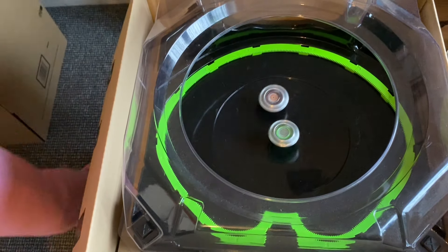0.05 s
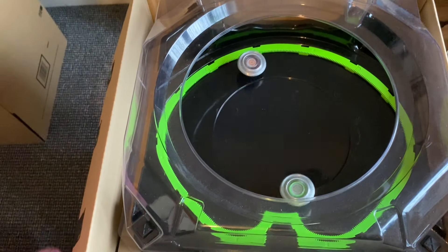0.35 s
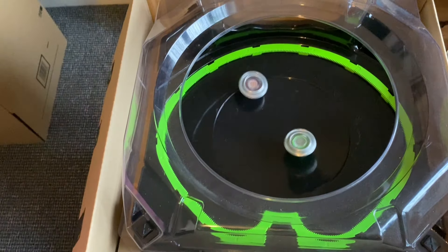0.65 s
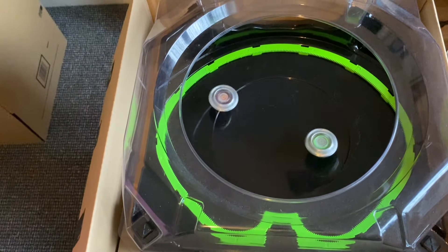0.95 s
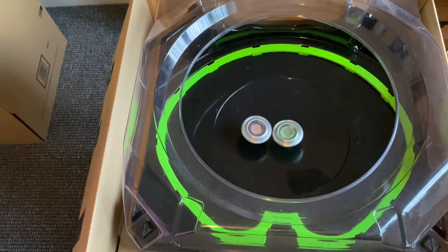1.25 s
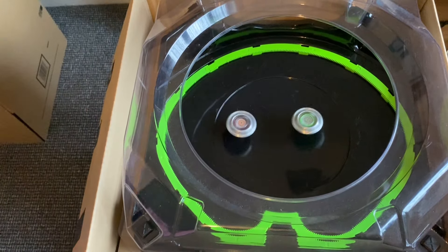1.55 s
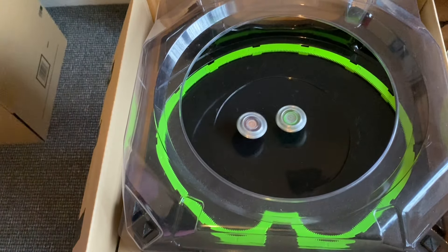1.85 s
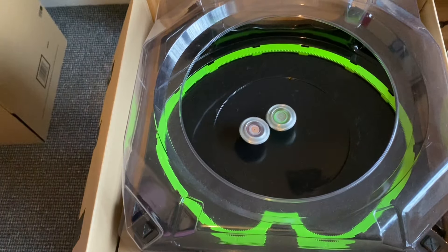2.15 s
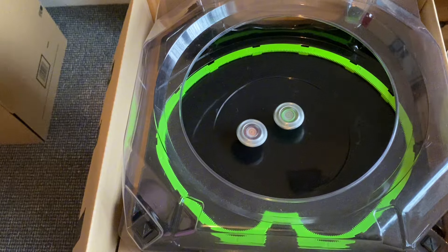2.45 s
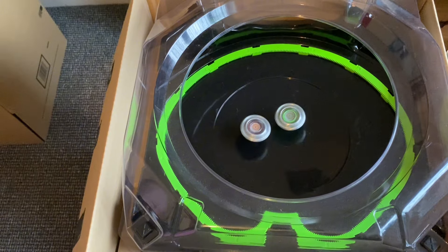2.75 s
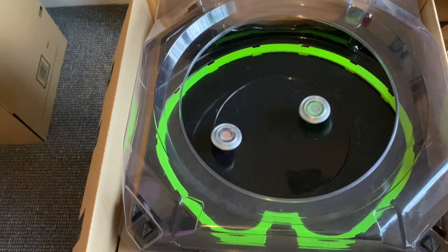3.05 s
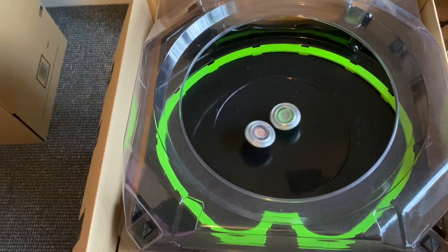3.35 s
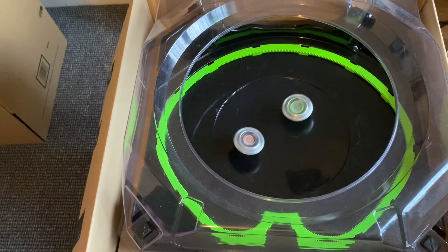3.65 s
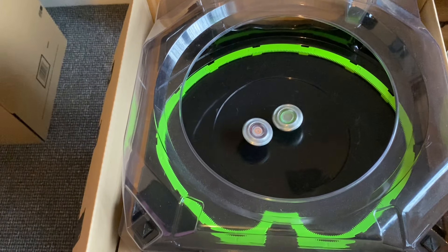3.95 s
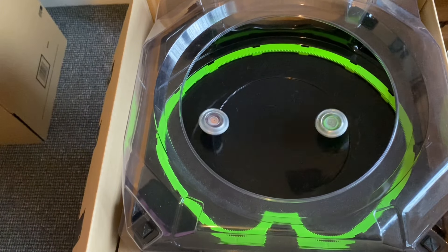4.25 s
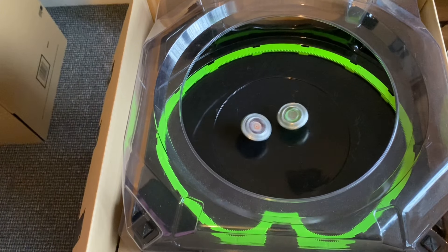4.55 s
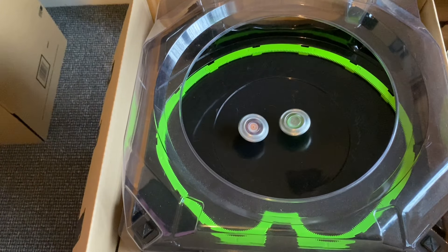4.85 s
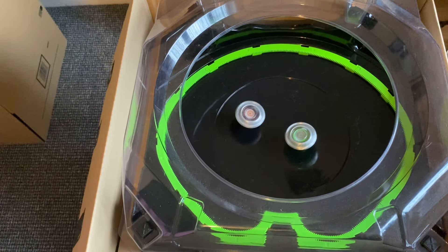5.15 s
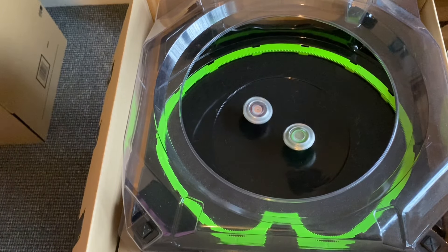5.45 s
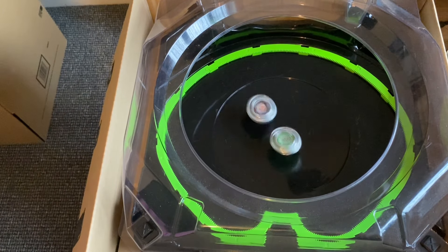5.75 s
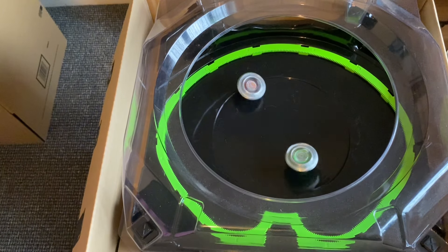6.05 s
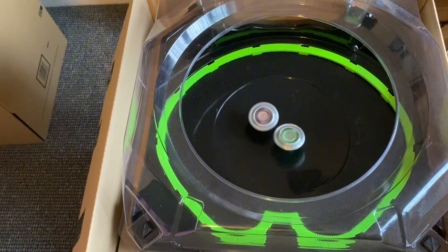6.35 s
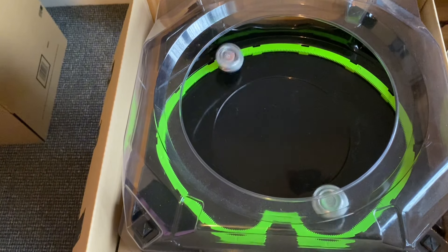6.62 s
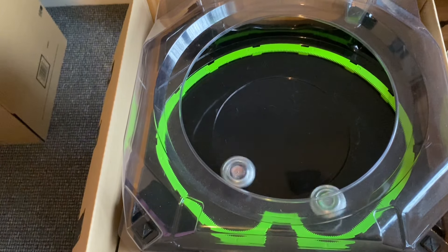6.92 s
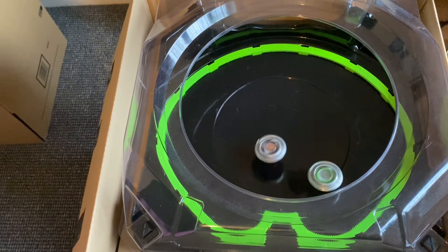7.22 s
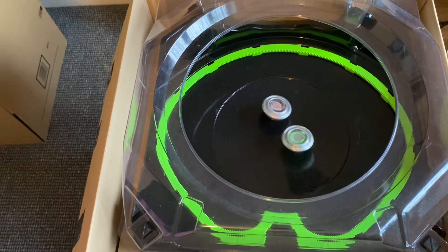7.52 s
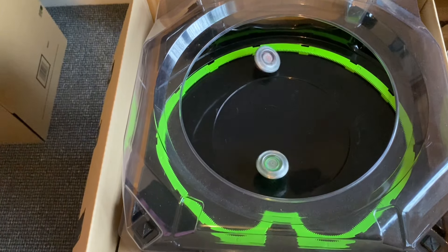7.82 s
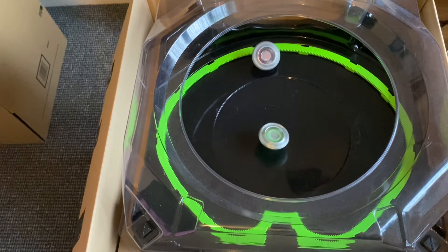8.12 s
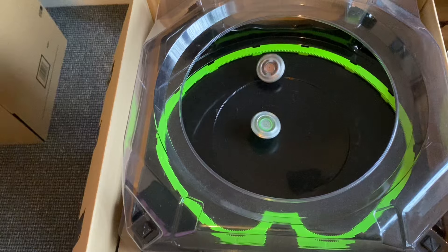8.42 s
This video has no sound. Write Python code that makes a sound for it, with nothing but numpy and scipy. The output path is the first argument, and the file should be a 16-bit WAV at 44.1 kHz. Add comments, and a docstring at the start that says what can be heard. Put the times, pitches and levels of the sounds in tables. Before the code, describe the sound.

Irregular metallic clacks and hollow plastic rattles as two whirring toy tops clash and skid around a plastic arena.

```python
"""Two metal spinning tops battle in a thin plastic bowl, close by in a small room.
From the start the rims whirr and the tips scrape and drum, pulsing once a turn. From 0.1 s the
toothed rims clash in bright clacks that jolt the bowl; the tops skid and tap the wall. Between
1 and 6 s they stand upright in near-silent spells, clashing and, from 3.4 s, grazing. From 6.6 s
the slowing tops wobble and scrape roughly; the last clash comes at 7.6 s."""
import sys
import numpy as np
from scipy import signal
from scipy.fft import rfft, irfft, next_fast_len
from scipy.io import wavfile
from scipy.ndimage import map_coordinates

SR = 44100
rng = np.random.default_rng(int(sys.argv[2]) if len(sys.argv) > 2 else 0)


def dump_mix(stems):
    """Bounce the given channels to the path in sys.argv[1] as a 16-bit WAV at rate SR."""
    frames = np.atleast_2d(stems).T  # one column per channel
    limited = np.clip(frames, -1, 1)  # hard clip at full scale
    pcm = np.round(limited * 32767).astype(np.int16)
    wavfile.write(sys.argv[1], SR, pcm)


N = 378378
HIT_SIZE = 2 ** 14  # samples
GRIT_DB, GRIT_HZ = 4, 220  # grain of a sliding contact
BOWL_LAG_S = 0.012

# bowl modes: f/Hz, width/Hz, level/dB
BOWL_MODES = [(66.6, 18, 10), (110, 12, 2), (136, 22, 11.5), (174, 18, 12.5), (215.7, 16.5, 6),
              (306, 20, 12), (356, 22, 14), (521, 38, 12.5), (700, 40, 3), (799, 36, 5), (1092, 40, 6),
              (1291, 45, 7), (1389, 35, 3.5), (1900, 150, 2), (2740, 40, 1), (3120, 80, 0)]
# spectra of tip drumming, metal sizzle, bowl thump, plastic rattle: f/Hz, level/dB
DRUM_SPECTRUM = [(20, -29), (38, -16), (58, -5.5), (125, 2), (200, -5), (280, -15.5), (450, -21),
                 (800, -39.5), (2500, -49)]
SIZZLE_SPECTRUM = [(500, -18.5), (2500, -11), (3900, -1.5), (4700, -5), (6100, -7), (7700, -2.5),
                   (9500, -11), (12000, -15.5), (16000, -23)]
THUMP_SPECTRUM = [(25, -42.5), (60, -12.5), (130, 6), (300, 1), (500, -9.5), (900, -17), (2000, -19.5),
                  (6000, -60)]
RATTLE_SPECTRUM = [(100, -28), (240, -12), (350, 2), (600, 4), (1100, 0), (1500, -4), (2200, 3.5),
                   (3200, -1), (5500, -5), (8000, -3), (11000, -11), (16000, -19.5)]


def amp(db):
    """Decibels to gain."""
    return 10 ** (np.asarray(db) / 20)


def unit(x):
    """Scale to rms 1."""
    return x / np.sqrt(np.mean(x ** 2) + 1e-20)


def along(points, hz):
    """Interpolate (f/Hz, value) points on a log axis."""
    f, v = np.transpose(points)
    return np.interp(np.log(hz + 1), np.log(f + 1), v)


def curves(rows):
    """Per-sample curve of each column after t/s."""
    s, *cols = np.transpose(rows)
    return [np.interp(np.arange(N) / SR, s, c) for c in cols]


def wobble(rate_hz):
    """Smooth random curve with knots at rate_hz."""
    knots = rng.standard_normal(int(N * rate_hz / SR) + 4)
    return map_coordinates(knots, [np.arange(N) * rate_hz / SR])


def filtered(x, response):
    """Apply a frequency response."""
    size = next_fast_len(N + SR // 2)
    return irfft(rfft(x, size) * response(np.fft.rfftfreq(size, 1 / SR)), size)[..., :N]


def shaped(x, spectrum):
    """Filter by (f/Hz, level/dB) points."""
    return filtered(x, lambda hz: amp(along(spectrum, hz)))


def resonance(hz, centre_hz, width_hz):
    """Gain of one mode."""
    return 1 / np.sqrt(1 + (2 * (hz - centre_hz) / width_hz) ** 2)


def body(spectrum, modes, hz):
    """Gain of a broad spectrum with modes on top."""
    peaks = sum((amp(db) * resonance(hz, f, width)) ** 2 for f, width, db in modes)
    return amp(along(spectrum, hz)) * np.sqrt(1 + peaks)


def hit_axes():
    """t/s and f/Hz of one hit."""
    return np.arange(HIT_SIZE) / SR, np.fft.rfftfreq(HIT_SIZE, 1 / SR)


def struck(force, gain):
    """Minimum-phase response of a body to a short force."""
    cepstrum = irfft(np.log(np.maximum(gain, 1e-6)))
    cepstrum[1:HIT_SIZE // 2] *= 2
    cepstrum[HIT_SIZE // 2 + 1:] = 0
    return irfft(rfft(force) * np.exp(rfft(cepstrum)))


def levelled(x, lo_hz, hi_hz, span_s):
    """Scale a hit's band energy to that of rms 1 over span_s."""
    hz = np.fft.rfftfreq(HIT_SIZE, 1 / SR)
    band = irfft(rfft(x) * ((hz > lo_hz) & (hz < hi_hz)))
    return x * np.sqrt(span_s * SR / (np.sum(band ** 2) + 1e-20))


def add(track, s, sound):
    """Mix a sound in at time s."""
    start = max(round(s * SR), 0)
    part = track[start:start + len(sound)]
    part += sound[:len(part)]


def spinning(spin_hz, second_touch):
    """One top: imbalance hum, and tip pressure peaking once or twice a turn."""
    angle = 2 * np.pi * np.cumsum(spin_hz * (1 + 0.0038 * wobble(8))) / SR
    hum = sum(amp(along(DRUM_SPECTRUM, k * spin_hz) + 4 * wobble(7))
              * np.sin(k * angle + rng.uniform(0, 2 * np.pi)) for k in range(1, 7))
    touch = lambda phase: np.exp(4 * (np.cos(phase) - 1))
    return hum, touch(angle) + second_touch * touch(angle + np.pi)


def wall(hz):
    """Gain of the hollow-ringing wall."""
    # wall modes: f/Hz, width/Hz, level/dB
    modes = [(523, 38, -2.5), (563, 33, -7.5), (690, 17, -9), (1095, 43, -10), (1295, 18, -13),
             (1410, 21, -16), (1567, 30, -17.5), (1955, 140, -14.5)]
    return np.sqrt(sum((amp(db) * resonance(hz, f, width)) ** 2 for f, width, db in modes))


def tips():
    """Tips hum, drum and scrape on the bowl, pulsing each turn; rims whirr after the launch."""
    # tip levels, brisk, gentle, then rough: t/s, scrape/dB, drum/dB, sizzle/dB re scrape
    run = [(0, -53.5, -41, -0.5), (.8, -53.5, -41, -4.5), (1.7, -52, -39, -4), (3.1, -57, -44, -9),
           (4.4, -55, -45, -9.5), (4.8, -58.5, -44, -9.5), (6, -55, -44, -3), (6.6, -45, -41.5, -2),
           (7.05, -46.5, -49, -7.5), (7.35, -50, -46, 0), (7.65, -46, -37.5, -1), (7.87, -45.5, -41, -6),
           (8.1, -44, -39.5, 0), (8.58, -44, -42, -4.5)]
    # spin of the wobblier top: t/s, f/Hz
    spin = [(0, 100), (.6, 97), (1.15, 91), (3.2, 65.5), (4.5, 57), (6.2, 52), (7.45, 46.3), (8.58, 43)]
    # spectra of tip scrape and rim whirr: f/Hz, level/dB
    scrape_spectrum = [(100, -27), (300, 10.5), (550, 1.5), (900, 5), (1400, -0.5), (2200, 7), (3200, 0),
                       (4000, -8.5), (5000, -10), (8000, -7), (16000, -25)]
    whirr_spectrum = [(2500, -30), (3600, -10.5), (4150, 3.5), (4600, -1.5), (5400, -9.5), (7000, -31.5)]
    lean_s, launch_s = 8.0, 1.75
    t = np.arange(N) / SR
    scrape_db, drum_db, sizzle_db = curves(run)
    calm_db = calm(t)
    wobbly_hum, wobbly_press = spinning(curves(spin)[0], second_touch=.8 * (t > lean_s))
    other_hum, other_press = spinning(104 * np.exp(-.055 * t), second_touch=0)
    bite = lambda: amp(3.5 * np.tanh(wobble(45)))  # no two turns bite alike
    press = wobbly_press * bite() + .3 * other_press * bite()
    friction = lambda depth: rng.standard_normal(N) * amp(2 * wobble(500)) * (1 + depth * press)
    rumble = unit(filtered(rng.standard_normal(N), lambda hz: body(DRUM_SPECTRUM, BOWL_MODES, hz)))
    drum = unit(1.1 * unit(wobbly_hum + other_hum) + rumble)
    # the tops wander between spots that favour different modes
    spots = [[(f, width, db + rng.normal(1, 3)) for f, width, db in BOWL_MODES] for _ in range(3)]
    scrape = np.zeros(N)
    for modes in spots:
        weight = amp(5 * np.tanh(wobble(5)))
        scrape += weight * filtered(friction(1.15), lambda hz: body(scrape_spectrum, modes, hz))
    # hard-running tops climb the wall
    hollow = unit(filtered(friction(1.15) * amp(GRIT_DB * wobble(GRIT_HZ / 2)), wall))
    hollow *= amp(-10.5 + 0.52 * (scrape_db - scrape_db.mean()) + 2 * wobble(9))
    sizzle = unit(shaped(friction(1.5), SIZZLE_SPECTRUM))
    whirr = unit(shaped(friction(3), whirr_spectrum)) / (1 + (t / launch_s) ** 12)
    grip_db = scrape_db - calm_db + 1.2 * wobble(20)
    return (amp(drum_db - 0.84 * calm_db + 1.9) * drum
            + amp(grip_db + 0.5) * (unit(scrape) + hollow)
            + amp(grip_db + sizzle_db) * sizzle
            + amp(-59 - calm_db) * whirr)


def clacks():
    """Toothed rims chatter for milliseconds, ring and jolt the bowl."""
    # rim clashes: t/s, level/dB, 3 clanks/dB re level, 15 kHz glint/dB, thump/dB, rattle/dB, chatter/s
    clashes = [(0.1187, -17.5, -15, -12.5, -14, -9, -26, -58, 0.0037),
               (0.8152, -18, -17.5, -16, -14, -2, -29, -56, 0.0065),
               (1.2697, -15.5, -11.5, -13, -15.5, -6.5, -29.5, -50.5, 0.0048),
               (1.4461, -16, -28.5, -8, -16.5, 0, -31.5, -46.5, 0.0047),
               (1.8225, -14, -18.5, -17, -22, -7.5, -37, -72, 0.0045),
               (2.1325, -20, -18, -19.5, -10.5, -7, -46.5, -65.5, 0.0029),
               (2.2335, -19, -16, -17, -12.5, -0.5, -44, -70, 0.004),
               (2.372, -15.5, -23, -21, -18, -4.5, -47.5, -78, 0.0054),
               (2.642, -16.5, -23, -10.5, -18.5, -12.5, -39, -56.5, 0.0045),
               (2.888, -15.5, -23.5, -13.5, -17.5, -6, -30, -48.5, 0.0047),
               (3.386, -17.5, -11, -12, -15, 0, -29.5, -51, .004),
               (3.8283, -16.5, -19.5, -13.5, -13.5, -3.5, -30.5, -51, .0025),
               (4.0712, -17, -15, -19.5, -7.5, -1, -32.5, -55, 0.0081),
               (4.6105, -16, -14, -23, -13.5, -12, -32, -56.5, .004),
               (4.96, -16, -12.5, -33.5, -11, -6.5, -37, -65, 0.0049),
               (5.3726, -15.5, -15, -15.5, -21.5, -4, -31.5, -49.5, 0.0023),
               (5.7635, -15, -15, -12.5, -18, -6, -29, -47.5, 0.0037),
               (6.3162, -21.5, -4.5, -13.5, -12, -1, -38, -52, 0.0025),
               (6.4637, -17, -7.5, -14.5, -13, -5, -25, -48, 0.0047),
               (7.1201, -22.5, -11, -18, -8, -5, -30, -41, 0.00082),
               (7.6063, -17.5, -21, -11.5, -8, -11, -29, -52, 0.0056)]
    # high rim modes: f/Hz, width/Hz, level/dB
    rim_modes = [(8000, 400, 2), (9610, 260, 6.5), (10170, 160, 2), (10480, 340, 9), (15240, 220, 11),
                 (15630, 200, 5)]
    # clanking rim modes: f/Hz, width/Hz
    clank_modes = [(3900, 190), (4450, 380), (5450, 560)]
    # impact spectrum: f/Hz, level/dB
    crack_spectrum = [(100, -42.5), (700, -27.5), (1500, -21.5), (2500, -5.5), (4700, -8.5), (6000, 0),
                      (8000, 5.5), (9500, 4), (11500, -1.5), (14000, 4), (15700, -4.5), (17000, -16.5)]
    settle_s, jolt_t60_s = 0.011, 0.073
    metal, bowl = np.zeros(N), np.zeros(N)
    t, hz = hit_axes()
    mean_clank_db = np.mean(clashes, axis=0)[2:5].mean()
    for s, db, *clank_db, glint_db, thump_db, rattle_db, chatter_s in clashes:
        # tooth contacts break off, loose parts settle
        chatter = 1 / (1 + (t / chatter_s) ** 10) + 0.85 * np.exp(-t / settle_s)
        force = chatter * rng.standard_normal(HIT_SIZE)
        # the contact point weights the modes
        modes = [(f, width, level + rng.normal(0, 2.5)) for f, width, level in rim_modes]
        fuller_db = 1.1 * (np.mean(clank_db) - mean_clank_db)
        colour = amp(along([(3000, fuller_db + 0.5), (6200, fuller_db + 2), (7500, 2), (10000, 2.5),
                            (11500, 0.95), (15000, glint_db + 7.5)], hz))
        ring = struck(force, body(crack_spectrum, modes, hz) * colour)
        add(metal, s, amp(db) * levelled(ring, 7500, 12000, .01))
        for (f, width), mode_db in zip(clank_modes, clank_db):
            clank = struck(chatter * rng.standard_normal(HIT_SIZE), resonance(hz, f, width))
            add(metal, s, amp(db + mode_db) * levelled(clank, f - 200, f + 200, .01))
        add(bowl, s, amp(rattle_db + 3.5) * landing_rattle(t, hz))
        jolt = amp(-60 * t / jolt_t60_s)
        add(bowl, s, amp(thump_db) * (amp(-6) * bending_wave(hz) + amp(0.5) * thump(jolt, hz)))
    return amp(-1) * metal + amp(-4.5) * bowl


def bending_wave(hz):
    """A push crosses the thin bowl, highs first, so pitch falls; path and colour vary by spot."""
    ref_hz = 198.3
    delay_s = .008 * np.exp(rng.normal(0, .25))  # at ref_hz
    spot_db = along([(f, rng.normal(0, 3)) for f in (150, 300, 600)], hz)
    tilt_db = along([(70, -5.5), (350, 1), (600, 2.5)], hz)
    gain = amp(along(THUMP_SPECTRUM, hz) + tilt_db + spot_db)
    phase = 4 * np.pi * delay_s * np.sqrt(ref_hz * hz)
    return levelled(irfft(gain * np.exp(-1j * phase)), 150, 900, .03)


def thump(jolt, hz, colour=1):
    """A jolted top bounces on its tip and shakes the bowl."""
    force = rng.standard_normal(HIT_SIZE) * jolt
    return levelled(struck(force, body(THUMP_SPECTRUM, BOWL_MODES, hz) * colour), 150, 900, .03)


def landing_rattle(t, hz):
    """A jolted top lands on the plastic in quick, uneven bounces."""
    land_s, t60_s = 0.032, 0.09
    bounces = amp(5 * map_coordinates(rng.standard_normal(200), [t * 250]))
    envelope = np.minimum(t / land_s, 1) * amp(-60 * np.maximum(t - land_s, 0) / t60_s)
    force = rng.standard_normal(HIT_SIZE) * bounces * envelope
    gain = body(RATTLE_SPECTRUM, BOWL_MODES, hz) * amp(along([(500, -3.5), (1500, 1)], hz))
    return levelled(struck(force, gain), 900, 3400, .07)


def skids():
    """A skidding top drives the bowl's modes: a grainy rattle that rises, holds and dies."""
    # skids on the plastic: t/s, level/dB, thump/dB, contact/s
    events = [(0.203, -41, -34, 0.021), (0.298, -38.5, -19.5, 0.084), (0.606, -35.5, -26.5, 0.022),
              (0.961, -36.5, -25, 0.056), (4.202, -40, -32.5, 0.03), (4.318, -40.5, -30.5, 0.026),
              (5.89, -39.5, -31.5, 0.023), (6.021, -42.5, -29, 0.0065), (6.622, -26, -30, 0.012),
              (6.80, -38, -46, 0.062), (7.648, -39, -26, 0.031), (8.006, -38, -51, 0.021),
              (8.501, -41.5, -28.5, 0.038)]
    # thump colour, wall shaken more than floor: f/Hz, level/dB
    heave = [(80, -11.5), (150, 0), (330, -0.5), (520, 4), (900, 3)]
    rise_share, t60_s = 0.053, 0.071
    rattle, bowl = np.zeros(N), np.zeros(N)
    t, hz = hit_axes()
    mean_db = np.mean(events, axis=0)[1]
    for s, db, thump_db, contact_s in events:
        grains = rng.standard_normal(HIT_SIZE) * amp(GRIT_DB * wobble(GRIT_HZ)[:HIT_SIZE])
        treble_db = -3.5 + 0.99 * (db - mean_db)  # harder is brighter
        colour = amp(along([(2500, 0.013), (6000, treble_db)], hz))
        rise = 1 - np.exp(-t / (rise_share * contact_s))
        contact = rise * amp(-60 * np.maximum(t - contact_s, 0) / t60_s)
        ring = struck(grains * contact, body(RATTLE_SPECTRUM, BOWL_MODES, hz) * colour)
        add(rattle, s, amp(db) * levelled(ring, 700, 3500, .02))
        add(bowl, s + BOWL_LAG_S, amp(thump_db) * thump(contact, hz, colour=amp(along(heave, hz))))
    return amp(-0.5) * rattle + amp(-8.5) * bowl


def taps():
    """A rim snaps against the wall, which rings hollow."""
    # wall taps: t/s, snap/dB, ring/dB
    events = [(0.299, -37.5, -43.5), (.608, -45, -42.5), (5.928, -49, -49), (6.023, -45, -44),
              (6.539, -31.5, -38), (6.622, -22.5, -39), (7.4756, -42, -65), (7.7301, -32, -40),
              (7.803, -41, -46), (8.0063, -28, -33)]
    # rim-on-plastic spectrum: f/Hz, level/dB
    snap_spectrum = [(200, -25), (700, -4.5), (2000, 1), (6000, -0.5), (10000, -5.5), (16000, -18)]
    t60_s = 0.042
    out = np.zeros(N)
    t, hz = hit_axes()
    for s, snap_db, ring_db in events:
        force = rng.standard_normal(HIT_SIZE) * amp(-60 * t / t60_s)
        snap = struck(force, body(snap_spectrum, BOWL_MODES, hz))
        ring = struck(force, wall(hz))
        add(out, s, amp(snap_db) * levelled(snap, 1500, 12000, .01))
        add(out, s + BOWL_LAG_S / 2, amp(ring_db) * levelled(ring, 400, 2200, .03))
    return out


def calm(t):
    """Drop in dB while the tops stand upright."""
    # upright spells: start/s, end/s, scrape drop/dB
    spells = [(1.05, 1.444, 8.5), (1.757, 2.226, 12.5), (2.234, 2.88, 16), (3.387, 3.773, 15),
              (4.946, 5.308, 16.5), (5.41, 5.725, 17)]
    fall_s, wake_s = 0.13, 0.087
    return sum(drop_db * np.clip((t - start) / fall_s, 0, 1) * np.clip((end - t) / wake_s + .5, 0, 1)
               for start, end, drop_db in spells)


def grazes():
    """Rims barely touch: three light, fading ticks."""
    # rim brushes: t/s, level/dB
    events = [(3.355, -50.5), (3.802, -59), (4.569, -54), (4.583, -46), (4.846, -61), (4.893, -60.5),
              (4.941, -58.5), (5.274, -63), (5.328, -60), (5.981, -56)]
    gap_s, decay_s, loss_db = 0.0094, 0.0036, 2
    out = np.zeros(N)
    t, hz = hit_axes()
    for s, db in events:
        for k in range(3):
            force = rng.standard_normal(HIT_SIZE) * np.exp(-t / decay_s)
            tick = struck(force, amp(along(SIZZLE_SPECTRUM, hz)))
            add(out, s + k * gap_s, amp(db - k * loss_db) * levelled(tick, 2000, 12000, .01))
    return out


def room(x):
    """Room echo at two microphone ports; treble dies soonest."""
    # room decay: f/Hz, t60/s
    decay = [(100, 0.8), (600, 0.46), (2000, 0.31), (4500, 0.33), (10000, 0.29), (15500, 0.23)]
    predelay_s = .006
    hz, t, noise = signal.stft(rng.standard_normal((3, SR // 2)), SR, nperseg=256)
    tails = signal.istft(noise * amp(-60 * t / along(decay, hz)[:, None]), SR, nperseg=256)[1]
    pair = tails[0] + .35 * tails[1:]  # close ports share most of the field
    pair = np.pad(pair / np.linalg.norm(pair[0]), ((0, 0), (round(predelay_s * SR), 0)))
    return signal.fftconvolve(x[None], pair, axes=1)[:, :N]


def scene():
    """Tops, bowl and room reach two ports with offsets in level and phase."""
    # background hush: f/Hz, level/dB
    hush_spectrum = [(20, -6), (70, 15), (200, -6.5), (700, -24.5), (3000, -29), (16000, -37.5)]
    # left port re right: f/Hz, level/dB
    balance = [(40, -2), (130, -2), (330, -6), (550, -9.5), (1000, -4.5), (1800, -0.5), (2800, -3),
               (4000, -1.5), (5200, 0), (16000, 0)]
    # left port's lead: f/Hz, phase/rad
    lead = [(100, 0), (700, .4), (1700, .05), (4300, .8), (5000, .1), (6000, 1.6), (6700, 2.7), (8000, 3.7),
            (9700, 5.7), (11200, 6.6), (13000, 9.1), (14000, 9.6), (16000, 12.5)]
    hits = clacks() + grazes()
    plastic = skids() + taps() + tips()
    hush = amp(-56) * unit(shaped(rng.standard_normal(N), hush_spectrum))
    # the tops wander: a new echo for each second's hits
    second = np.arange(N) // SR
    echo = sum(room(hits * (second == k)) for k in np.unique(second))
    echo = shaped(echo, [(5000, -12), (10000, -18)])
    air = hits + plastic + hush + echo + amp(-11.5) * room(plastic)
    left = lambda hz: amp(along(balance, hz) / 2) * np.exp(.5j * along(lead, hz))
    return filtered(air, lambda hz: np.array([left(hz), 1 / left(hz)]))


def record(dry):
    """Soft peak limit, then a steep low-pass."""
    ceiling, cutoff_hz = .8, 16150
    rounded = dry / (1 + np.abs(dry / ceiling) ** 4) ** (1 / 4)
    return filtered(rounded, lambda hz: 1 / np.sqrt(1 + (hz / cutoff_hz) ** 120))


dry = scene()
out = record(dry)
dump_mix(out)
```